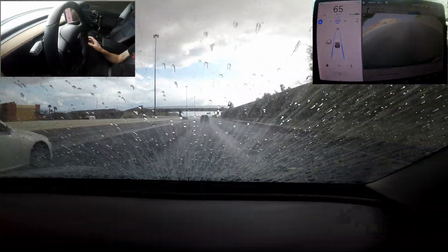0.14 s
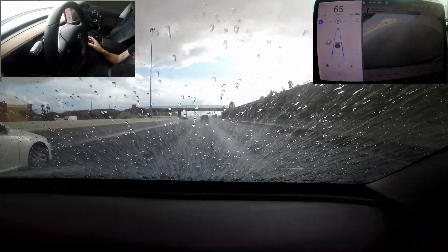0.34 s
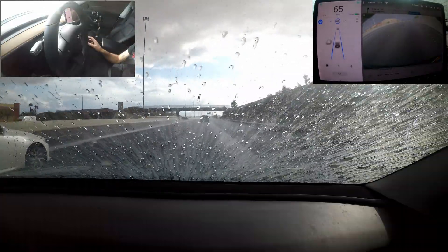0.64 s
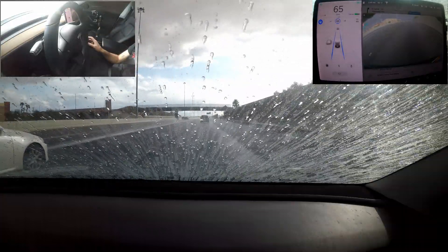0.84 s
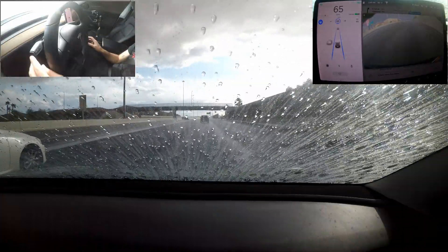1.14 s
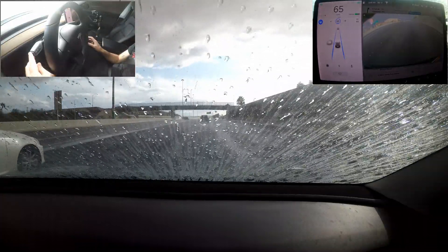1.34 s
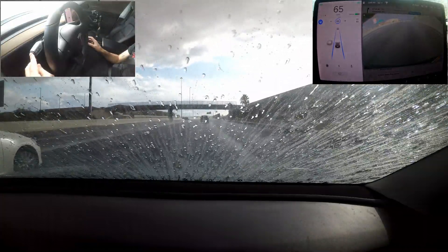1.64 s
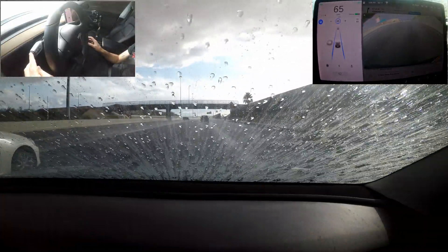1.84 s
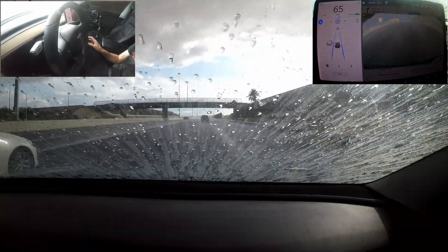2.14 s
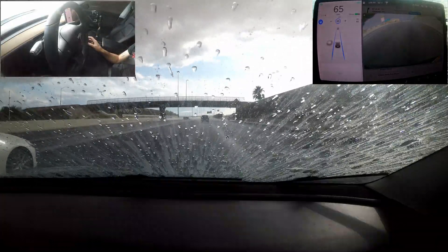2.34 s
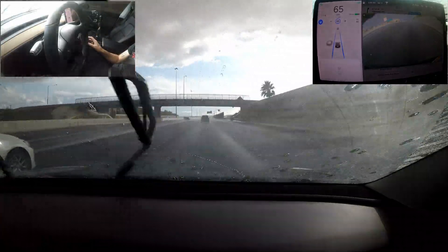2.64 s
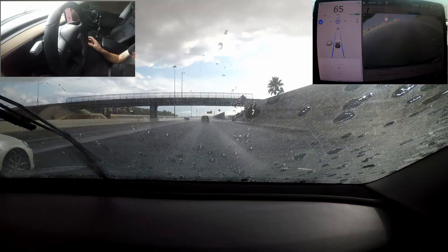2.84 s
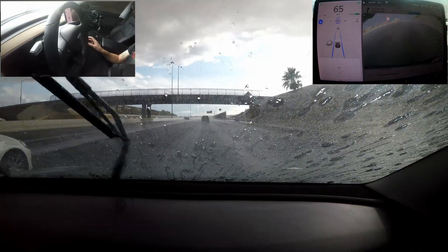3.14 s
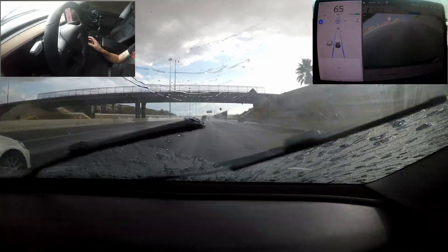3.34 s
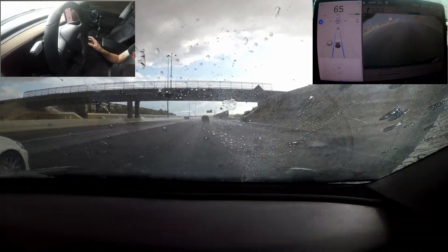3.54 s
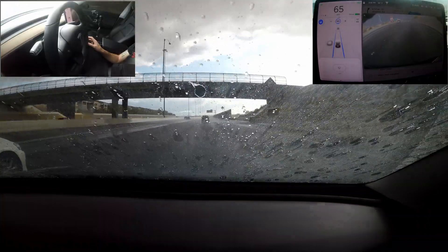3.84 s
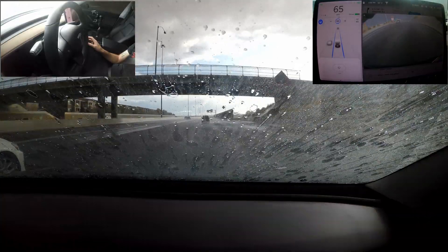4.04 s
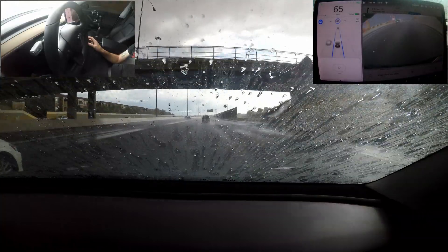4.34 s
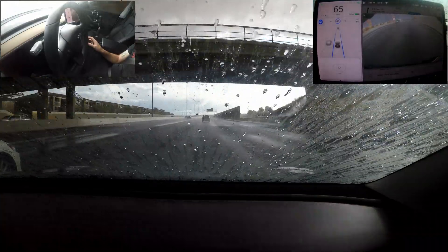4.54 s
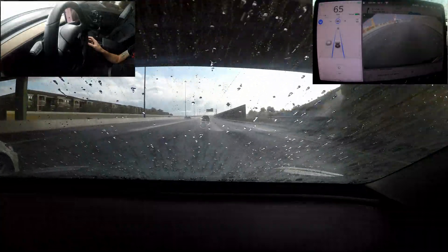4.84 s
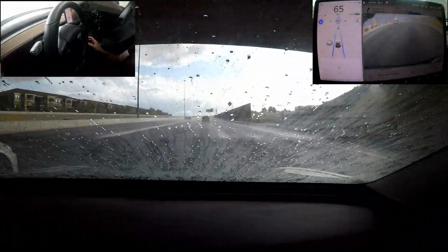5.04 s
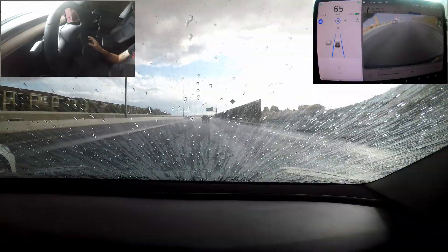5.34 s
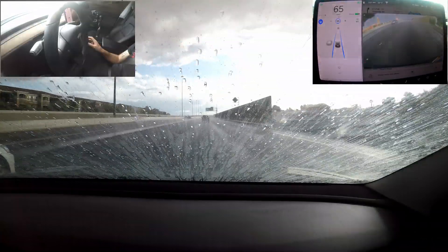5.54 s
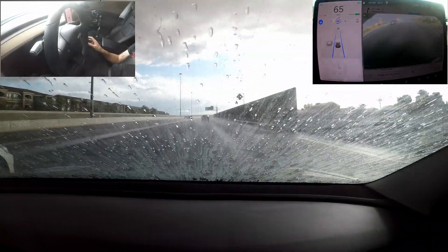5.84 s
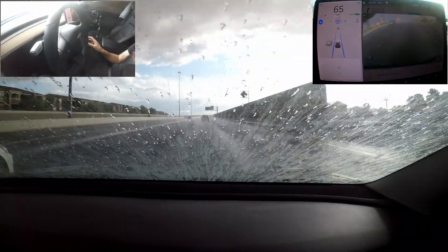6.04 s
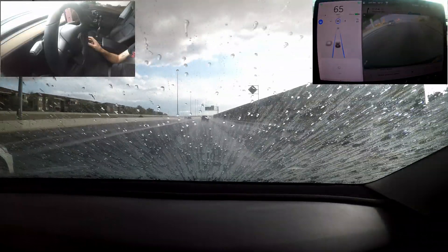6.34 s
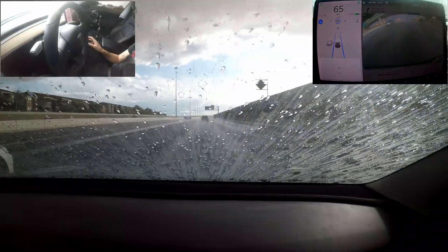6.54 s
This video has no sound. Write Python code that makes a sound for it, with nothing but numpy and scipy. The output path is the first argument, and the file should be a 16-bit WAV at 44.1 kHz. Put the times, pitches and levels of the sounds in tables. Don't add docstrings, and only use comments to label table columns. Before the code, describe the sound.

Uneven, clumpy rain pelts the glass and roof of a moving car, bright ticks and spray mixed with duller thuds, over a steady deep rumble and muffled wind hiss. Late on, the patter vanishes beneath a bridge for an instant, exposing the road and stray drips, then returns abruptly at its loudest before easing. Heard from a seat in the closed cabin, with a single microphone evening out loud peaks.

```python
import sys
import numpy as np
from scipy import signal
from scipy.fft import rfft, irfft, next_fast_len
from scipy.io import wavfile
from scipy.ndimage import uniform_filter1d

SR = 44100
rng = np.random.default_rng(int(sys.argv[2]) if len(sys.argv) > 2 else 0)


def convert_level_to_amplitude(level_db):
    exponent = np.asarray(level_db, float) / 20
    return 10 ** exponent


def materialize(psi):
    bounded = np.clip(np.atleast_2d(psi).T, -1, 1)
    quanta = np.round(bounded * 32767).astype(np.int16)
    wavfile.write(sys.argv[1], SR, quanta)


N = 295143
T = np.arange(N) / SR
LEAD = 4096

# [f/Hz, level/dB per Hz]
GLASS = [(1200, -28), (2200, -5), (3200, 0.5), (4200, 0.5), (5300, 0), (6200, -3), (7000, -9.5),
         (8500, -20), (11000, -43.5)]
# [f/Hz, level/dB per Hz]
ROOF = [(250, -41), (500, -4), (750, -0.5), (1000, -2.5), (1300, 0.5), (1800, -2), (2300, -6), (3500, -15)]
# [f/Hz, level/dB per Hz]
SPRAY = [(5000, -32), (7500, 9.5), (8500, 4.5), (10000, 1.5), (12000, -5), (13800, -6), (15000, -12),
         (15700, -30)]
# [t/s, glass patter level/dB, fineness of breakup/dB, weight on roof/dB]
RAINFALL = [(0.0, -29.5, 2, 1.5), (0.5, -28.5, 0.5, -0.5), (0.9, -29, 1, 1), (1.15, -30, 1, 2.5),
            (1.4, -28, 1.5, -0.5), (1.9, -27, 0, -1), (2.3, -28.5, -1, -0.5), (2.7, -29, -2, 0),
            (3.2, -28, 0.5, 1), (3.6, -27.5, -1, 0), (3.9, -27, -2, 2), (4.4, -28, 0, -1),
            (5.0, -27.5, -1.5, -0.5), (5.55, -24.5, 1, 1), (5.85, -25.5, -1, -2), (6.1, -28.5, 2, 0),
            (6.4, -26, -3, 0), (6.69, -32, 1, 1)]
# [t/s, level/dB]
LULLS = [(0.065, -7), (0.224, -3.1), (0.544, -5.5), (0.604, -5), (0.734, -8), (1.083, -1.5), (1.487, -6.5),
         (2.23, -4.5), (2.629, -3.2), (2.754, -3.4), (2.968, -3), (3.103, -7), (3.253, -7), (3.508, -7),
         (3.801, -3.1), (3.906, -3), (4.001, -8.5), (4.465, -8.5), (4.724, -7), (4.974, -1), (5.687, -4),
         (5.902, -6.5), (6.101, -9.5), (6.386, -4)]
# [t/s, level/dB]
GUSTS = [(0.19, 5.5), (0.494, 2.5), (0.673, 2.5), (0.798, 3), (1.337, 5.5), (1.442, 3), (1.801, 4),
         (2.306, 7.5), (2.484, 4), (2.854, 1), (3.066, 5.5), (3.228, 2.5), (3.756, -3.5), (3.931, 0),
         (4.041, 3), (4.185, 3.5), (4.674, 3.5), (4.749, 4.5), (6.021, 4), (6.146, 1), (6.291, 3),
         (6.51, 3)]


def rain():
    lull_s, gust_s = 0.008, 0.014
    roof_follow, spray_follow = 0.83, 0.77
    roof_lag_s = 0.023
    spray_db = -19
    gusts_db = swells([(s, lull_s, db) for s, db in LULLS] + [(s, gust_s, db) for s, db in GUSTS])
    s, glass_db, fine_db, weight_db = np.transpose(RAINFALL)
    clumps = convert_level_to_amplitude(1.3 * drift(52))

    on_glass = falls(800, 5.48, clumps, 0.54)
    on_roof = 1.42 * on_glass + falls(500, 7.2, clumps, 0.41)
    bursts = on_glass * convert_level_to_amplitude(1.8 * rng.standard_normal(N + LEAD))
    glass = patter(on_glass, GLASS, 0.00045, -15, 0.059, 2400, 6500)
    roof = patter(on_roof, ROOF, 0.0037, 3.5, 0.041, 520, 1530)
    spray = patter(bursts, SPRAY, 0.00045, -8, 0.069, 8000, 14500)

    ahead_db = shelter_db(0)
    glass_gain_db = gusts_db + ahead_db
    roof_gain_db = roof_follow * gusts_db + shelter_db(roof_lag_s) + np.interp(T, s, weight_db)
    spray_gain_db = spray_db + spray_follow * gusts_db + ahead_db
    spray_gain_db = spray_gain_db + np.interp(T, s, fine_db) + 0.7 * drift(15)
    struck = convert_level_to_amplitude(glass_gain_db) * glass + convert_level_to_amplitude(roof_gain_db) * roof + convert_level_to_amplitude(spray_gain_db) * spray
    return convert_level_to_amplitude(np.interp(T, s, glass_db)) * struck


def falls(per_s, spread_db, clumps, fine):
    landed = rng.random(N + LEAD) < per_s * np.pad(clumps, (LEAD, 0), "edge") / SR
    mist = fine * (rng.random(N + LEAD) < 0.15)
    return mist + landed * convert_level_to_amplitude(spread_db * np.minimum(rng.exponential(1, N + LEAD), 2.9))


def patter(size, surface, crack_s, tail_db, t60, lo_hz, hi_hz):
    spot = rng.integers(0, 20, len(size))
    out = np.zeros(N)
    for k, hz in enumerate(np.geomspace(lo_hz, hi_hz, 20)):
        drop = splash(surface, crack_s, tail_db, t60, hz, 0.82)
        out += signal.oaconvolve(size * (spot == k), drop)[LEAD:N + LEAD]
    return evened(out)


def splash(surface, crack_s, tail_db, t60, hz, lift):
    t = np.arange(3000) / SR
    crack = t / crack_s * np.exp(1 - t / crack_s)
    tail = convert_level_to_amplitude(tail_db - 60 * t / t60) * (1 - np.exp(-t / 0.00082))
    burst, echoes = rng.standard_normal((2, 3001))
    blow = np.diff(burst) * crack + echoes[1:] * tail
    sound = signal.oaconvolve(blow, colour(surface))[:3000]
    sound = sound + lift * resonate(sound, hz, 1370)
    return sound / abs(sound).max()


def shelter_db(lag_s):
    bridge_in_s, dry_s, bridge_out_s = 5.035, 5.1, 5.46
    return_s, return_db, settle_s = 0.012, 1, 0.079
    after = np.maximum(T - bridge_out_s, 0)
    back = 20 * np.log10(np.clip(after / return_s, 1e-4, 1)) + return_db * np.exp(-after / settle_s)
    covered = np.maximum(T - bridge_in_s - lag_s, 0)
    covered = covered + 2.2 * np.maximum(T - dry_s - 0.5 * lag_s, 0)
    return np.where(T > bridge_out_s, back, -260 * covered)


# [t/s, peak level/dB, ring of the glass f/Hz, splash level/dB above it]
DROPS = [(0.1267, -13, 5720, -23), (0.1817, -20, 3460, -41), (0.3774, -27, 4730, -21),
         (0.4212, -30, 4440, -29), (0.4733, -11.5, 4370, -25), (1.2352, -8.5, 5600, -28),
         (1.3862, -18, 3290, -31), (1.742, -11, 5430, -32), (2.0607, -9, 5530, -30),
         (2.2752, -8.5, 5970, -27), (2.5511, -13, 5260, -35), (3.1178, -13, 4700, -24),
         (3.2697, -10.5, 4540, -27), (3.4257, -15, 5030, -24), (3.566, -12, 5900, -25),
         (3.6698, -11, 4970, -32), (3.7474, -9, 5730, -31), (3.9285, -11, 5040, -22),
         (4.1584, -13, 5470, -28), (4.2328, -9, 5770, -26), (4.4846, -9.5, 4770, -36),
         (4.595, -21, 5030, -34), (4.629, -31, 5300, -21), (4.8917, -9.5, 5040, -35),
         (5.021, -13, 5130, -23), (5.4735, -13, 3390, -35), (5.7109, -13, 5170, -25),
         (5.8194, -18, 3530, -26), (6.1335, -25, 3530, -26), (6.357, -12.5, 3560, -35)]
# [t/s, peak level/dB, ring of the glass f/Hz, splash level/dB above it]
DRIPS = [
    (5.107, -16, 3520, -28),
    (5.194, -35, 3500, -32),
    (5.199, -31, 3200, -30),
    (5.206, -42, 4500, -30),
    (5.27, -50, 3000, -16),
]


def drops():
    out = np.zeros(N + 3000)
    for s, db, hz, spray_db in DRIPS + DROPS:
        ring = splash(GLASS, 0.0005, -13, 0.08, hz, 1.2)
        thud_db = -8 + 12 * rng.uniform(-1.1, 1)
        thud = convert_level_to_amplitude(thud_db) * splash(ROOF, 0.0011, 8, 0.033, 1700, 0.36)
        mist = convert_level_to_amplitude(spray_db + 9) * splash(SPRAY, 0.00063, 0, 0.056, 9000, 0.3)
        out[round(s * SR):][:3000] += convert_level_to_amplitude(db - 1) * (ring + thud + mist)
    return out[:N]


# [t/s, peak level/dB]
SHATTERS = [(0.0624, -40), (0.1266, -40), (0.3775, -29), (0.4728, -32), (1.2361, -38), (2.5461, -39),
            (3.1168, -36), (3.6381, -40), (3.7469, -39), (3.928, -40), (4.2333, -40), (4.349, -37),
            (4.6304, -36), (4.6448, -29), (4.6604, -42), (4.6753, -31), (4.7501, -33), (5.0624, -41),
            (5.4779, -37), (5.6311, -34), (5.685, -32), (5.8192, -35)]


def shatters():
    out = np.zeros(N + 3000)
    for s, db in SHATTERS:
        out[round(s * SR):][:3000] += convert_level_to_amplitude(db + 4) * splash(SPRAY, 0.00018, -12, 0.03, 14500, 2.5)
    return out[:N]


# [f/Hz, width f/Hz, level/dB]
BOOM = [(25.4, 16, -5.5), (40, 9.5, -1.5), (62, 26, -12.5)]
# [f/Hz, width f/Hz, level/dB]
HUM = [(97, 18.1, 2.5), (130.3, 28, -5), (171.2, 34.3, -8.5)]
# [f/Hz, width f/Hz, level/dB]
CAVITY = [(249.3, 28.4, 0)]
# [f/Hz, width f/Hz, level/dB]
ROAR = [(345.4, 42.6, -1), (408, 23, 0.5), (477, 64, -3)]
# [t/s, half length t/s, level/dB]
HEAVES = [(0.145, 0.068, 3), (1.202, 0.04, -1), (1.337, 0.052, 0.5), (2.205, 0.06, -4.5), (2.514, 0.043, 1),
          (2.639, 0.033, -6), (3.512, 0.12, -4), (3.981, 0.08, -2.5), (4.136, 0.04, -3.5),
          (4.385, 0.048, 2), (6.016, 0.06, -3), (6.505, 0.059, -1.5)]
# [t/s, half length t/s, level/dB]
SEAMS = [(0.454, 0.2, -3.5), (0.728, 0.025, 3.3), (0.933, 0.14, -4.5), (1.457, 0.37, 3), (1.896, 0.048, -2),
         (2.265, 0.048, 3), (2.684, 0.085, 3), (4.4, 0.036, -3), (4.774, 0.023, 5), (4.919, 0.046, -2.5),
         (5.557, 0.36, 0.5), (6.121, 0.034, -2)]
# [t/s, half length t/s, level/dB]
RIDGES = [
    (0.484, 0.37, -1.5),
    (2.34, 0.04, 3.0),
    (2.804, 0.04, 7.5),
    (3.068, 0.063, 5),
    (4.405, 0.04, -2.5),
    (5.034, 0.051, 3.0),
    (5.932, 0.028, 0),
    (5.966, 0.2, 2),
]
# [t/s, half length t/s, level/dB]
COARSE = [
    (0.569, 0.041, -4.5),
    (1.242, 0.11, 2.4),
    (1.452, 0.04, -5.5),
    (1.716, 0.026, -4.5),
    (3.367, 0.09, 4.5),
    (4.106, 0.29, 2),
    (5.363, 0.2, -2.0),
    (5.966, 0.07, -3.5),
    (6.6, 0.036, -4.5),
]


def road():
    boom = road_part(BOOM, -14.5, HEAVES)
    hum = road_part(HUM, -19.5, SEAMS)
    cavity = road_part(CAVITY, -31.5, RIDGES)
    roar = road_part(ROAR, -25, COARSE)
    return boom + hum + cavity + roar


def road_part(modes, level_db, patches):
    size = next_fast_len(N)
    f = np.fft.rfftfreq(size, 1 / SR)
    power = sum(convert_level_to_amplitude(2 * db) / (1 + ((f - hz) / (0.97 * width)) ** 2) ** 2 for hz, width, db in modes)
    trim_hz = 606
    shape = np.sqrt(power) / np.sqrt(1 + (f / trim_hz) ** 16)
    part = irfft(shape * rfft(rng.standard_normal(size)), size)[:N]
    slow_power = uniform_filter1d(uniform_filter1d(part ** 2, 3500), 3500)
    return convert_level_to_amplitude(level_db + swells(patches)) * evened(part / slow_power ** 0.25)


# [f/Hz, level/dB per Hz]
HISS = [(300, -12), (600, 0), (1000, -4), (1700, -9), (2000, -13), (2400, -20), (3500, -30), (5500, -33),
        (6300, -36), (7300, -42), (8200, -36), (9400, -32), (10600, -38), (11500, -47), (14000, -60)]
# [t/s, level/dB]
HISS_LEVEL = [
    (0, -38.5),
    (5.1, -34.5),
    (5.25, -34),
    (5.45, -35),
    (6.69, -37.5),
]


def wind_hiss():
    return hiss(HISS, HISS_LEVEL, 0.49)


# [f/Hz, level/dB per Hz]
FAR_RAIN = [(1200, -20), (2000, -3), (2600, 0), (3400, -4), (4500, -11), (6000, -15), (7500, -30)]
# [t/s, level/dB]
CURTAIN = [
    (5.13, -58),
    (5.22, -56),
    (5.32, -57),
    (5.4, -53),
    (5.46, -40),
    (5.5, -66),
]


def far_rain():
    return hiss(FAR_RAIN, CURTAIN, 1.4)


def hiss(shape, level, swell_db):
    s, db = np.transpose(level)
    noise = rng.standard_normal(N + LEAD)
    air = evened(signal.oaconvolve(noise, colour(shape))[LEAD:N + LEAD])
    return convert_level_to_amplitude(np.interp(T, s, db) + swell_db * drift(30)) * air


def evened(x):
    return x / np.sqrt(np.mean(x ** 2) + 1e-20)


def colour(points, size=1024):
    hz, db = np.transpose(points)
    f = abs(np.fft.fftfreq(size, 1 / SR))
    log_gain = np.log(convert_level_to_amplitude(np.interp(np.log(f + 1), np.log(hz), db, left=-70, right=-70)))
    return np.fft.ifft(np.exp(log_gain - 1j * signal.hilbert(log_gain).imag)).real[:size // 2]


def resonate(x, hz, width):
    turn = np.exp(2j * np.pi * hz * np.arange(len(x)) / SR)
    r = np.exp(-np.pi * width / SR)
    return 2 * (turn * signal.lfilter([1 - r], [1, -r], x / turn)).real


def drift(rate):
    knots = rng.standard_normal(400)
    return evened(np.interp(T * rate, np.arange(400), knots))


def swells(rows):
    t = T[::32]
    bells = sum(db * np.exp(-0.5 * ((t - s) / abs(half_s)) ** 2) for s, half_s, db in rows)
    return np.interp(T, t, bells)


def scene():
    return (rain() + drops() + shatters() + road() + wind_hiss() + far_rain())[None]


def band_limit(x):
    return signal.sosfilt(signal.butter(12, 15710, fs=SR, output="sos"), x)


def record(dry):
    power_db = 10 * np.log10(abs(uniform_filter1d(dry[0] ** 2, 1500)) + 1e-12)
    held = dry * convert_level_to_amplitude(-0.25 * np.maximum(power_db + 10.5, 0) + 0.86)
    limited = 1.243 * np.tanh(held / 1.294)
    top_cut = signal.firwin(255, 15350, window=("kaiser", 8), fs=SR)[None]
    mix = signal.oaconvolve(limited, top_cut, "same")
    return band_limit(mix)


dry = scene()
out = record(dry)
materialize(out)
```